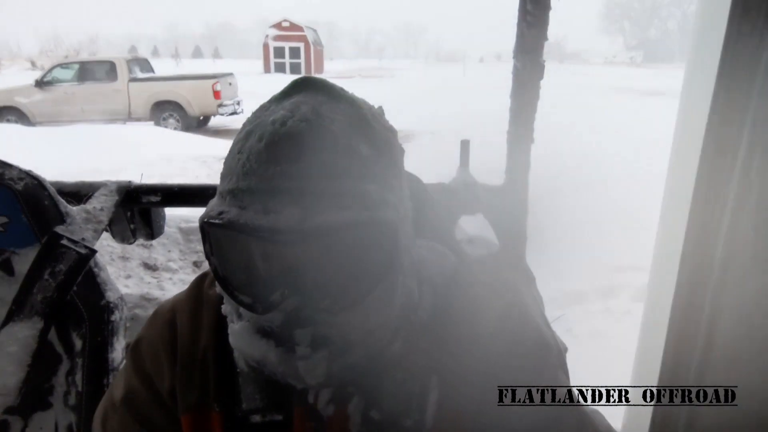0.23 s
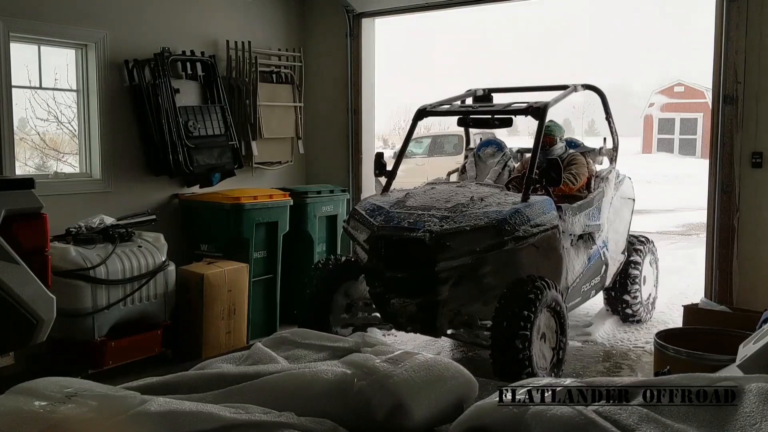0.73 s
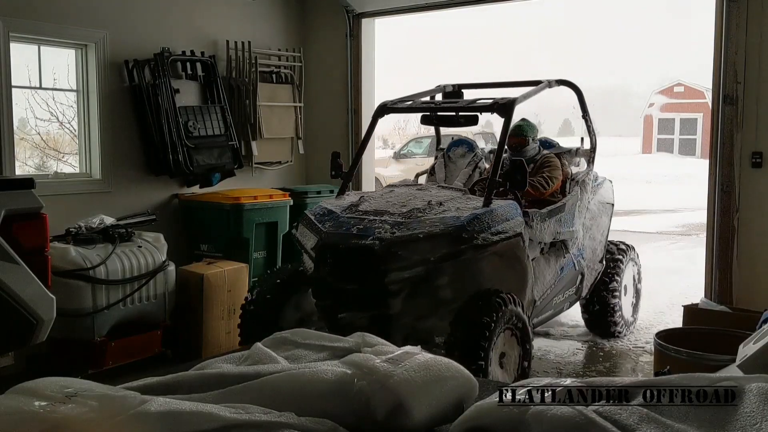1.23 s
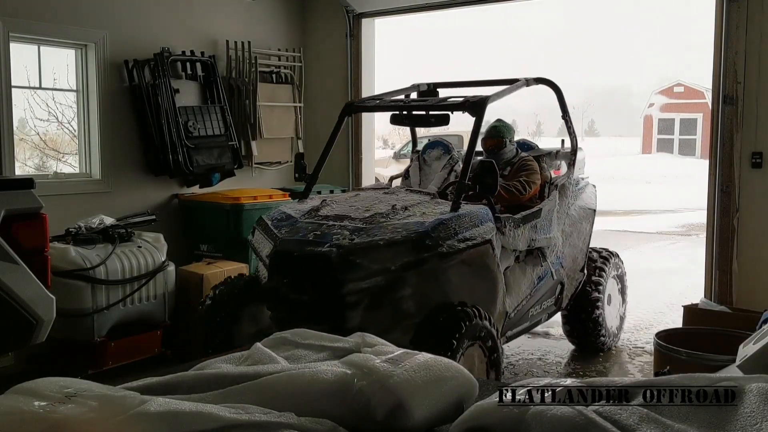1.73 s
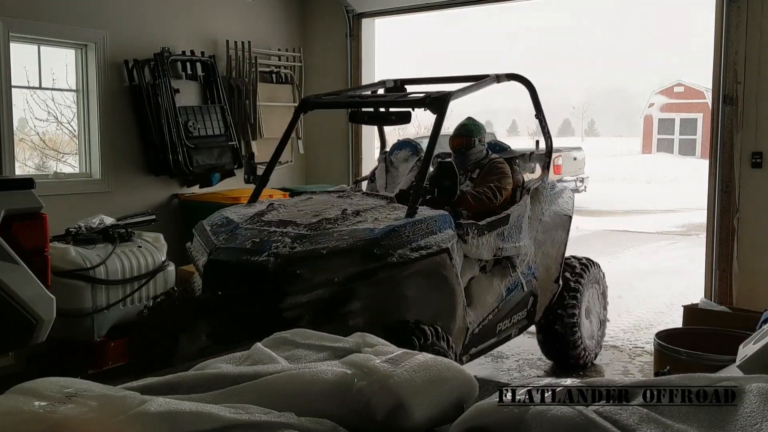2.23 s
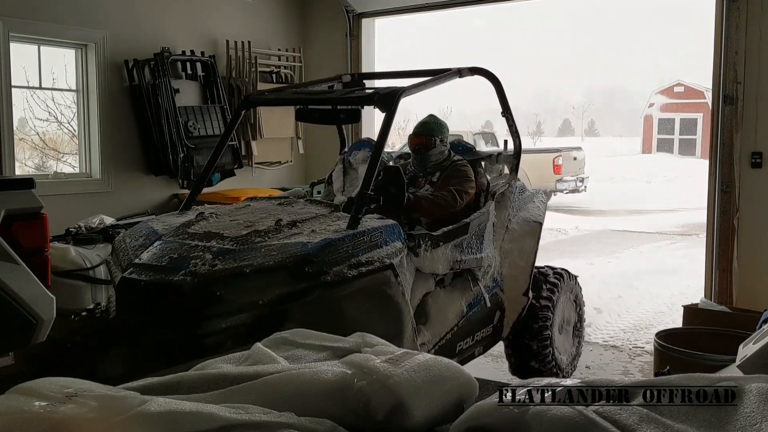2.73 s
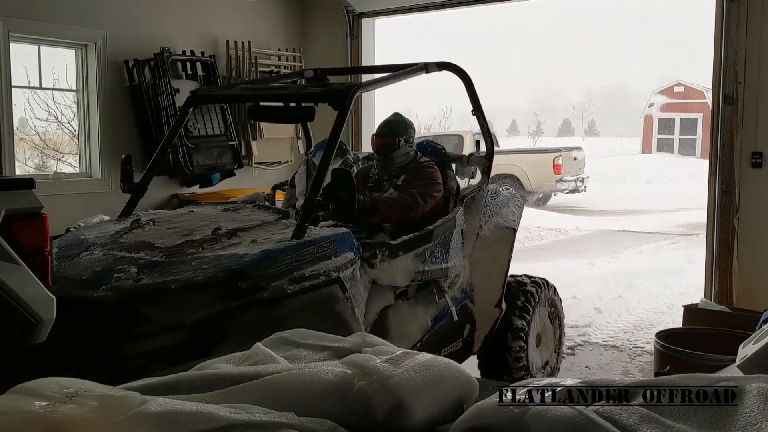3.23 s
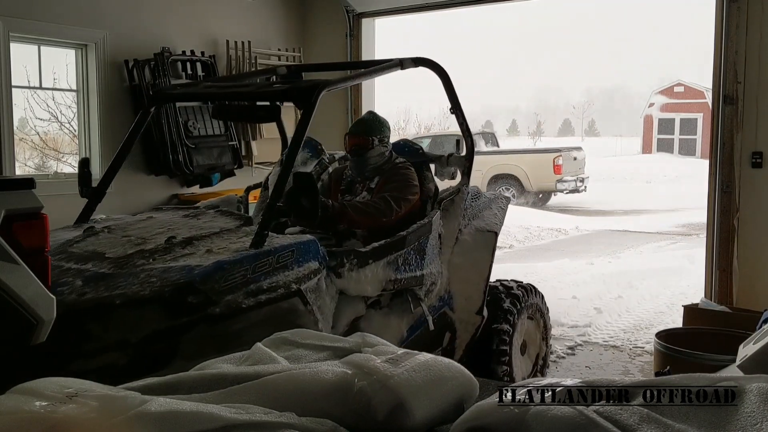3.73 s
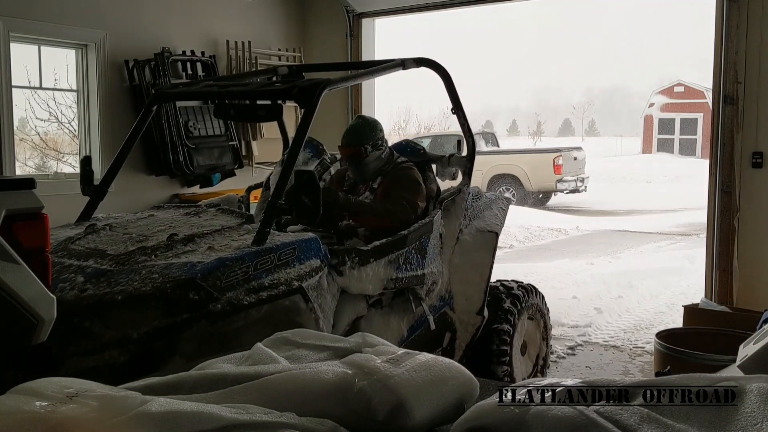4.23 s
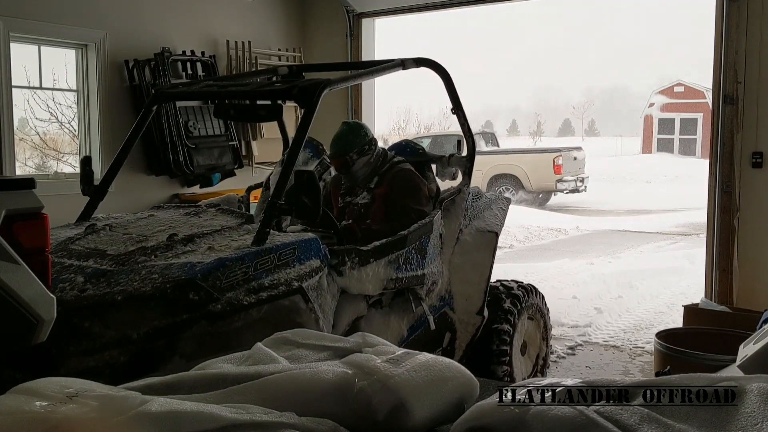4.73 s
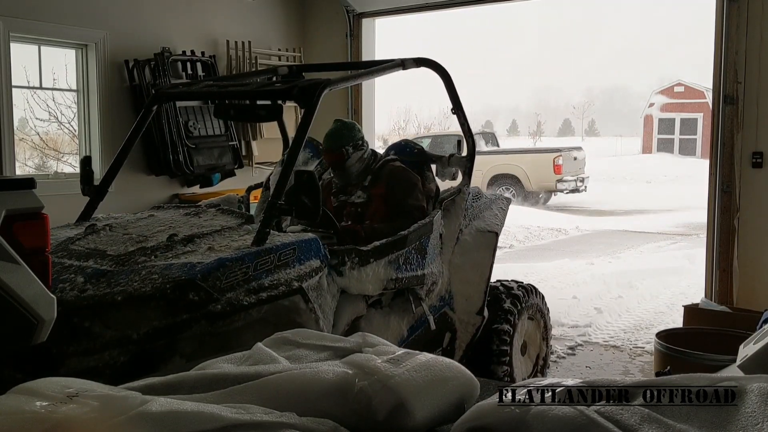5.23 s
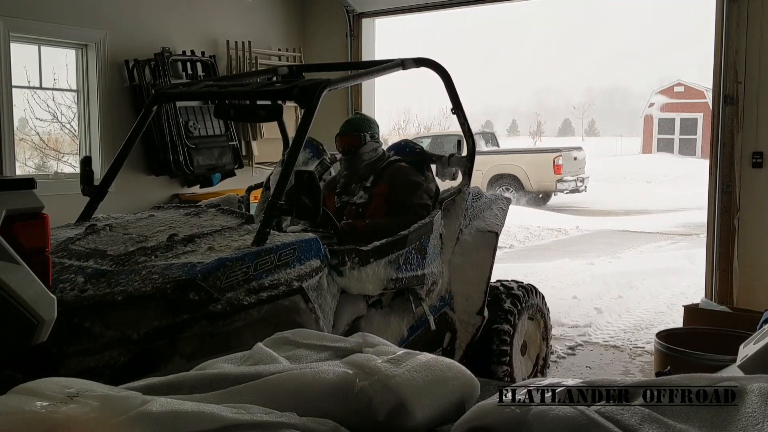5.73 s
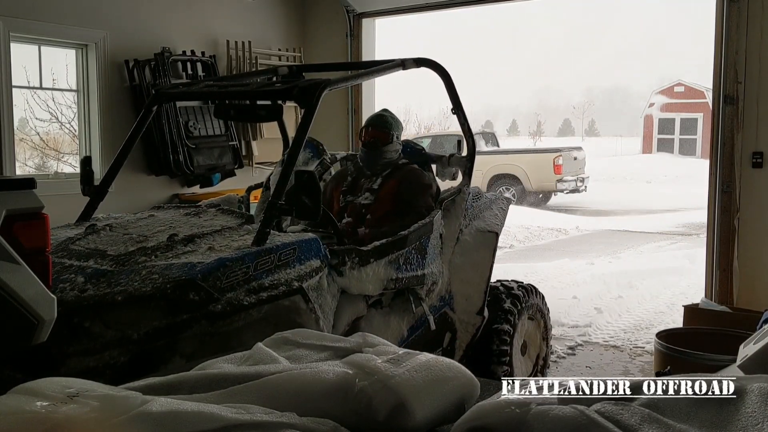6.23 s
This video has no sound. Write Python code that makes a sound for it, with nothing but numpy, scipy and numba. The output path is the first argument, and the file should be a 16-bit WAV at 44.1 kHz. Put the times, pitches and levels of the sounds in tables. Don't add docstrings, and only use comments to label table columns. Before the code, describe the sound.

Close engine boom and snowy hiss jump to a duller distant buggy rolling into a garage, revving once, a panel singing, then steady puttering idle.

```python
import sys
import numpy as np
from scipy import signal
from scipy.fft import rfft, irfft, next_fast_len
from scipy.io import wavfile
from scipy.ndimage import uniform_filter1d
from numba import njit

SR = 44100
rng = np.random.default_rng(int(sys.argv[2]) if len(sys.argv) > 2 else 0)


def file_out(sig):
    cols = np.atleast_2d(sig).T
    lim = np.clip(cols, -1, 1)
    pcm = np.round(lim * 32767).astype(np.int16)
    wavfile.write(sys.argv[1], SR, pcm)


def convert_level_to_amplitude(level_db):
    exponent = np.asarray(level_db, float) / 20
    return 10 ** exponent


N = 285327
TIME = np.arange(N) / SR

# t/s, f/Hz
CAGE_SPEED = [
    (-0.003, 16.131),
    (0.174, 15.789),
    (0.26, 15.024),
    (0.471, 12.841),
]
# t/s, f/Hz
GARAGE_SPEED = [(.52, 22.9), (.64, 22.1), (.806, 19.9), (.92, 19.6), (1.014, 18.5), (1.188, 16.2),
                (1.421, 12.512), (1.516, 12.187), (1.607, 12.807), (1.786, 17.126), (1.851, 17.399),
                (2.221, 17.34), (2.73, 12.48), (2.755, 12.025), (3.162, 11.973), (3.512, 10.525),
                (3.833, 10.142), (6.507, 10.121)]
# t/s, change of rate/Hz, width/s
HUNTS = [
    (3.675, 0.234, 0.041),
    (4.071, 0.184, 0.095),
    (4.281, -0.128, 0.049),
    (4.628, -0.183, 0.1),
    (4.875, 0.387, 0.14),
    (5.177, -0.427, 0.04),
    (5.37, 0.181, 0.139),
    (6.06, 0.153, 0.255),
]
# t/s, level/dB, load/0-1
CAGE_EFFORT = [
    (0, -32.5, 0.99),
    (.25, -30, 0.8),
    (.36, -27.5, 0.98),
    (.47, -28.5, 0.82),
]
# t/s, level/dB, load/0-1
GARAGE_EFFORT = [(.48, -41, 0.55), (.63, -48.5, 0.61), (.78, -44, 0.77), (.95, -40.5, 0.65),
                 (1.199, -43.5, 0.42), (1.35, -45, 0.2), (1.55, -42.5, 0.43), (1.7, -35, 0.68),
                 (1.85, -35, 0.85), (2.25, -31.5, 0.9), (2.5, -37.5, 0.8), (2.8, -37, 0.46),
                 (3.3, -37, 0.68), (3.6, -39.5, 0.76), (4.6, -39.5, 0.67), (5.3, -39, 0.79),
                 (6.47, -39.5, 0.72)]
# f/Hz, width/Hz, level/dB
CAGE_BOOM = [(57.4, 11.9, 8.7), (79.8, 7.1, 19.0), (91.2, 4.8, 4.0), (105.5, 7.2, -2.5),
             (133.7, 32.0, -6.1), (191.5, 21.6, -11.1)]
GARAGE_BOOM = [(35, 13.8, 4), (43.1, 1.9, 3.5), (51.4, 1.1, -3.5), (71.3, 5.4, 8.5), (79.1, 4.6, 7),
               (83.3, 11.8, 0.9), (93.53, 4.34, 13), (105.5, 14.5, 0), (137.4, 7, -8.5), (156, 14.4, -12.5),
               (170.8, 9.1, -8.5), (192.6, 0.6, -5), (207.1, 0.89, -7.5)]
DOORWAY_BOOM = [(37, 10.6, 1), (54.6, 17, 2), (73, 16, 3), (99.7, 9.9, 6.5), (110.2, 11, 3), (150, 22, -25)]
TRIM_HZ = [10.2, 12, 14.3, 17.3]
# order, level/dB at idle, creeping, slowing, revving
CAGE_TRIM = [(2, 0, 6, 12, 24), (6, 0, -2, 9, 35), (7, 0, -12, -3.5, 0), (8, 0, 9, -1.5, 1.5),
             (9, 0, 2, -5, 7.5), (10, 0, 1, 8, 10), (11, 0, 5, 10, -11), (14, 0, 3, 8, 16),
             (18, 0, 0, 6, 8)]
GARAGE_TRIM = [(2, 0, -9, -13, -20), (3, -3, -4, -17, -27), (4, -0.5, 1, 0, 1.5), (5, 2, 0, 2.5, -4.5),
               (6, -8, -14, -6, -2.5), (7, -7.5, -6, 2.5, 11.5), (8, -1.5, 2, -1, 0), (9, 0.5, 2.5, 7.5, 0),
               (10, -4.5, -12, -5, -4.5), (11, -4.5, 5, 9, 21.5), (12, -5.5, 8.5, -5, -7),
               (13, 2.5, 3.5, -9, 12), (14, -4, -13, 12.5, -2), (15, -21, 3, -2, -5), (16, 4, 3, -6, -5),
               (17, -2.5, 1.5, 4, 11.5), (18, -6.5, 5, 9, 9), (19, 4, 17.5, 6, -7), (20, 3, 11, -6, -10),
               (21, 3.5, -9, 14, -14)]
# order, level/dB
DOORWAY_TRIM = [(2, -1), (3, 7), (4, 4.5), (5, 2.5), (6, -7), (7, 6), (8, 3.5), (9, -3)]
# f/Hz, width/Hz, level/dB
CAGE_RING = [(176.5, 22, -2.5), (219, 19, -3.5), (294, 18, -1), (346, 18, -11), (397.6, 12, -1.5),
             (538, 60, -17), (726, 90, -12.5), (855, 60, -17)]
GARAGE_RING = [(217.7, 3.6, -17), (263.9, 29, -2.5), (310.4, 29.3, 1.5), (328.8, 18, -8.5),
               (348, 5.4, -11.5), (509.4, 49, -18), (644, 41, -21.5), (804.4, 36, -20), (966, 34, -19)]
# f/Hz, density/dB per Hz
CAGE_HISS = [(150, -45), (250, -1), (393, -4.5), (586, -13), (802, -7.5), (955, -19), (1910, -26),
             (3230, -28), (11500, -41), (16000, -43)]
GARAGE_HISS = [(150, -14), (330, -22), (450, -29), (800, -29), (880, -38), (980, -30), (1200, -37),
               (1490, -29.5), (1880, -44), (2400, -32.5), (4200, -41), (6500, -47), (12500, -65.5),
               (16000, -64)]
# t/s, level/dB
CAGE_AIR = [
    (0, -49),
    (.2, -49.5),
    (.3, -50),
    (.38, -48.5),
    (.47, -46),
]
# t/s, rise/s, fall/s, level/dB, f/Hz
SLUSH = [
    (1.795, 0.022, 0.07, -38, 3100),
    (2.77, 0.012, 0.055, -44.5, 3300),
    (5.195, .02, 0.08, -44, 2800),
    (5.195, .02, .07, -58.5, 10500),
    (5.195, 0.02, 0.08, -44.5, 900),
    (5.264, 0.022, 0.09, -35.5, 2900),
    (5.268, .02, .07, -41, 4600),
    (5.26, .03, .1, -45, 600),
]
# t/s, length/s, level/dB
PANEL = [
    (1.5, 0.1, -60),
    (2.15, 0.15, -52),
    (2.72, .06, -54),
    (2.845, 0.12, -44),
    (3.075, 0.16, -42.5),
    (3.285, 0.04, -49),
]
# t/s, level/dB
SPRAY = [
    (0, -57.5),
    (.22, -54.5),
    (.27, -68),
    (.47, -59),
    (.485, -77),
    (.5, -52),
    (.54, -74),
    (.58, -106),
]
# t/s, level/dB
RUMBLE = [
    (.48, -36),
    (.65, -43),
    (.85, -46),
    (1.2, -47),
    (1.55, -47),
    (1.8, -42),
    (2.55, -38),
    (2.8, -48),
    (6.47, -52),
]
# f/Hz, width/Hz, level/dB
ROOM_BASS = [(42, 25, 2), (68, 9.2, 5), (98.5, 13, 4), (119, 23, -6)]
# f/Hz, likeness/0-1, left minus right/dB, left lag/rad
CAGE_PORTS = [(40, 0.84, -1.3, 0), (170, 0.88, -3.5, 0), (302, 0.54, -6, 0.0077), (700, 0.33, -3, 0),
              (1400, 0.25, 0.5, 0), (3000, 0.06, -3.5, 0), (11000, 0, -4.5, 0)]
GARAGE_BASS_PORTS = [(40, .995, 2, .17), (90, .995, 4, .47), (170, .96, 4.7, .97), (300, .97, 4.6, 1.67)]
GARAGE_PORTS = [(600, 1, 4.5, 1.58), (1020, 1, 5.8, 1.04), (1480, 0.2, 5, 0.044), (2460, 0.038, 0.15, -1.4),
                (4350, .03, 8.6, -1.1), (7150, 0.017, 10.3, -0.97), (15000, .02, 28.6, 0.61)]

CUT_S, CUT_FADE_S = 0.4742, 0.00007
CLICK_DB, CLICK_RISE_S = -14, 0.003
DOOR_S, DOOR_SPAN_S = 1.662, 0.13
FAN_DB_PER_HZ, FAN_OUTSIDE_DB_PER_HZ, FAN_IDLE_HZ = 0.5939, 0.081, 7.46
DULL_DB_PER_OCTAVE, ORDER_WANDER_DB = 26, 0.03
KNOCK_DB_PER_LOAD, KNOCK_SPLIT_HZ, KNOCK_TREBLE_SHARE = 33.5, 400, 0.48
ECHO_DB, ECHO_FALL_S = -4, 0.065
BREATH_DB = 1.15
GROWL_S, GROWL_HOLD_S, GROWL_DB, GROWL_ATTACK_DB_S, GROWL_RELEASE_DB_S = 1.8, 0.69, -45, 200, 33
SLUSH_TOP_HZ = 6800
PANEL_HZ, PANEL_ATTACK_DB_S, PANEL_RELEASE_DB_S = 490, 210, 170
PANEL_UPPER_HZ, PANEL_UPPER_DB, PANEL_UPPER_LATE_S = 517, -7, 0.06
PUMP_HZ, PUMP_DB = 13107, -88
SPRAY_HZ, SPRAY_WIDTH_HZ = 10800, 16000
HOUSING_HZ, TOP_HZ = 1876, 15760


def buggy(hz, outside, effort, boom, trim, lag, modes, colour, start_turn, second_turn, second_db, knock_db, hiss_db):
    level_db, load = curves(effort)
    turns = start_turn + np.cumsum(hz) / SR
    exhaust = convert_level_to_amplitude(level_db) * drone(hz, turns, outside, boom, trim, lag, second_turn, second_db)
    ring = convert_level_to_amplitude(knock_db) * knock(hz, turns, second_turn, load, modes)
    throb = convert_level_to_amplitude(hiss_db + 0.26 * np.cos(2 * np.pi * turns + 3.6) + 0.21 * walk(5.95))
    breath = BREATH_DB * uniform_filter1d(np.cos(2 * np.pi * turns + 2.0) + 0.98 * walk(45), size=64)
    near = exhaust + ring + hiss(colour, throb, breath, flicker_db=0.77)
    return near, hiss(colour, throb, breath, flicker_db=0.7)


def speed():
    swings = sum(step * np.exp(-((TIME - s) / width) ** 2) for s, step, width in HUNTS)
    return curves(GARAGE_SPEED)[0] + swings


def drone(hz, turns, outside, boom, trim, lag, second_turn, second_db):
    out = 0
    coarse = slice(None, None, 64)
    slow_hz, outdoors = hz[coarse], outside[coarse]
    indoors = 1 - outdoors
    trim_db = {round(k): db for k, *db in trim}
    doorway_db = dict(DOORWAY_TRIM)
    for k in range(2, 22):
        f = k * slow_hz
        gain = indoors * resonate(f, boom) + outdoors * resonate(f, DOORWAY_BOOM)
        gain = gain * (1 + convert_level_to_amplitude(second_db) * np.exp(-2j * np.pi * k * second_turn))
        octaves_up = np.maximum(np.log2(f / 102), 0)
        level_db = outdoors * (doorway_db.get(k, 0) - DULL_DB_PER_OCTAVE * octaves_up)
        level_db = level_db + indoors * np.interp(slow_hz, TRIM_HZ, trim_db.get(k, np.zeros(len(TRIM_HZ))))
        gain = gain * convert_level_to_amplitude(level_db + ORDER_WANDER_DB * walk(8)[coarse])
        phase = 2 * np.pi * (k * turns + lag)
        out = out + np.real(np.interp(TIME, TIME[coarse], gain) * np.exp(1j * phase))
    return out


def resonate(f, boom):
    return sum((-1) ** m * convert_level_to_amplitude(db) * 1j * f * w / (c ** 2 - f ** 2 + 1j * f * w)
               for m, (c, w, db) in enumerate(boom))


def knock(hz, turns, second_turn, load, modes):
    pulses = firings(turns, second_turn, second_db=2.5, scatter_db=1.3, jitter_s=0.00015)
    pulses = echoed(pulses / np.sqrt(hz))
    ring = 0
    for k, (f, width, db) in enumerate(modes):
        share = KNOCK_TREBLE_SHARE if f > KNOCK_SPLIT_HZ else 1
        level_db = db + KNOCK_DB_PER_LOAD * (load - 1) * share
        ring = ring + (-1) ** k * convert_level_to_amplitude(level_db) * band(pulses, f, 0.65 * width)
    return ring


def firings(turns, second_turn, second_db, scatter_db, jitter_s):
    cycles = np.arange(int(turns[0]), int(turns[-1]) + 1)
    when = np.interp(np.concatenate([cycles, cycles + second_turn]), turns, TIME)
    chance = rng.standard_normal((len(when), 2))
    size_db = np.repeat([0, second_db], len(cycles)) + scatter_db * chance[:, 0]
    size = convert_level_to_amplitude(size_db) * (when > 0)
    place = np.clip((when + jitter_s * chance[:, 1]) * SR, 0, N - 1).astype(int)
    pulses = np.zeros(N)
    np.add.at(pulses, place, size)
    return pulses


def echoed(pulses):
    fade = signal.lfilter([1], [1, -np.exp(-2 / (ECHO_FALL_S * SR))], pulses ** 2)
    return unit(pulses) + convert_level_to_amplitude(ECHO_DB) * unit(np.sqrt(fade) * rng.standard_normal(N))


def hiss(colour, throb, breath, flicker_db):
    out = 0
    for hz in 125 * 2 ** np.arange(0, 7.1, 1 / 4):
        noise = svf(rng.standard_normal(N), hz, hz / 4)
        noise = svf(noise, hz, hz / 4 + hz ** 2 / 5e4)
        level_db = on_log(hz, colour, column=1) + flicker_db * walk(16)
        out = out + noise * convert_level_to_amplitude(level_db + breath * hz / 12000)
    return out * throb / np.std(svf(out, 4220.0, 5600.0))


def growl(hz):
    gulp = convert_level_to_amplitude(0.71 * np.cos(4 * np.pi * np.cumsum(hz) / SR))
    open_db = held(GROWL_S, GROWL_HOLD_S, GROWL_DB, GROWL_ATTACK_DB_S, GROWL_RELEASE_DB_S)
    return convert_level_to_amplitude(open_db) * gulp * band(rng.standard_normal(N), 490, 250)


def slush():
    out = np.zeros(N)
    for s, rise, fall, db, hz in SLUSH:
        age = np.maximum(TIME - s, 0)
        swell = (1 - np.exp(-(age / rise) ** 2)) * np.exp(-age / fall)
        grains = rng.standard_normal(N) * convert_level_to_amplitude(1.6 * walk(150))
        dull = signal.butter(4, max(SLUSH_TOP_HZ, 1.5 * hz), fs=SR, output="sos")
        grains = svf(signal.sosfilt(dull, grains), 1.0 * hz, 1.2 * hz)
        out += convert_level_to_amplitude(db) * swell * unit(svf(grains, 0.7 * hz, 1.6 * hz))
    return out


def panel():
    gain = convert_level_to_amplitude(np.max([held(*row, PANEL_ATTACK_DB_S, PANEL_RELEASE_DB_S) for row in PANEL], axis=0))
    rub = convert_level_to_amplitude(-7) * band(rng.standard_normal(N), PANEL_HZ, 40)
    late_gain = convert_level_to_amplitude(PANEL_UPPER_DB) * np.roll(gain, int(PANEL_UPPER_LATE_S * SR))
    return gain * (panel_tone(PANEL_HZ) + rub) + late_gain * panel_tone(PANEL_UPPER_HZ)


def panel_tone(hz):
    phase = 2 * np.pi * np.cumsum(hz + 4 * walk(10)) / SR
    return np.sqrt(2) * convert_level_to_amplitude(2.5 * walk(30)) * np.sin(phase)


def spray():
    return convert_level_to_amplitude(curves(SPRAY)[0]) * band(rng.standard_normal(N), SPRAY_HZ, SPRAY_WIDTH_HZ)


def rumble():
    modes = sum(convert_level_to_amplitude(db) * band(rng.standard_normal(N), f, 1.95 * w) for f, w, db in ROOM_BASS)
    return convert_level_to_amplitude(curves(RUMBLE)[0]) * modes


def pump():
    return convert_level_to_amplitude(PUMP_DB) * np.sin(2 * np.pi * PUMP_HZ * TIME + 3 * walk(30))


def ports(near, diffuse, table, ripple_db):
    size = next_fast_len(N + SR)
    hz = np.maximum(np.arange(size // 2 + 1) * SR / size, 1)
    like, tilt_db, lag = (on_log(hz, table, column=c) for c in (1, 2, 3))
    like = np.clip(like, 0, 1)
    reach = np.clip(hz / 2500 - 1.3, 0, 1) * np.clip(2.6 - hz / 4800, 0, 1)
    housing = convert_level_to_amplitude(ripple_db * np.cos(2 * np.pi * hz / HOUSING_HZ) * reach) * (hz < TOP_HZ)
    a, b = rfft(near, size) * housing, rfft(diffuse, size) * housing
    skew = convert_level_to_amplitude(tilt_db / 2) * np.exp(-0.5j * lag)
    left = a * skew
    right = (like * a + np.sqrt(1 - like ** 2) * b) / skew
    return np.array([irfft(left, size)[:N], irfft(right, size)[:N]])


def unit(x):
    return x / np.sqrt(np.mean(x ** 2))


@njit
def svf(x, hz, width):
    y, b, l = np.empty(len(x)), 0., 0.
    g, k = np.tan(np.pi * hz / SR), width / hz
    for i in range(len(x)):
        v = (b + g * (x[i] - l)) / (1 + g * (g + k))
        b, l, y[i] = 2 * v - b, l + 2 * g * v, k * v
    return y


def band(x, hz, width):
    hz, width = float(hz), float(width)
    return unit(svf(svf(x, hz, width), hz, width))


def walk(rate):
    k = int(SR / rate)
    steps = np.repeat(rng.standard_normal(N // k + 1), k)
    return uniform_filter1d(uniform_filter1d(steps, k), k)[:N]


def held(s, length, db, attack_db_s, release_db_s):
    return db - attack_db_s * np.maximum(s - TIME, 0) - release_db_s * np.maximum(TIME - s - length, 0)


def curves(table):
    s, *columns = np.transpose(table)
    return [np.interp(TIME, s, c) for c in columns]


def on_log(hz, table, column):
    table = np.array(table)
    return np.interp(np.log(hz), np.log(table[:, 0]), table[:, column])


def cage_view():
    near, diffuse = buggy(curves(CAGE_SPEED)[0], np.zeros(N), CAGE_EFFORT, CAGE_BOOM, CAGE_TRIM, lag=0.51,
                          modes=CAGE_RING, colour=CAGE_HISS, start_turn=0.893, second_turn=0.25,
                          second_db=-0.5, knock_db=-33.5, hiss_db=curves(CAGE_AIR)[0])
    return ports(near, diffuse, CAGE_PORTS, ripple_db=2.5)


def garage_view():
    hz = speed()
    inside = np.clip((TIME - DOOR_S) / DOOR_SPAN_S, 0, 1)
    db_per_hz = FAN_OUTSIDE_DB_PER_HZ * (1 - inside) + FAN_DB_PER_HZ * inside
    fan_db = uniform_filter1d(-53.5 + db_per_hz * (hz - FAN_IDLE_HZ), size=SR // 12)
    near, diffuse = buggy(hz, 1 - inside, GARAGE_EFFORT, GARAGE_BOOM, GARAGE_TRIM, lag=0.474,
                          modes=GARAGE_RING, colour=GARAGE_HISS, start_turn=0.162, second_turn=0.232,
                          second_db=0.87, knock_db=-37.0, hiss_db=fan_db)
    near = near + rumble() + slush() + panel() + pump()
    garage = ports(near, diffuse + slush(), GARAGE_BASS_PORTS + GARAGE_PORTS, ripple_db=2.5)
    return garage + ports(growl(hz), np.zeros(N), GARAGE_BASS_PORTS, ripple_db=-2)


def scene():
    after = np.clip((TIME - CUT_S) / CUT_FADE_S, 0, 1)
    click = np.exp(-np.abs(TIME - CUT_S) / CLICK_RISE_S)
    cage = (1 - click) * cage_view() + convert_level_to_amplitude(CLICK_DB) * click
    garage = (1 - click) * garage_view()
    snow = ports(spray(), spray(), CAGE_PORTS, ripple_db=2)
    return (1 - after) * cage + after * garage + snow


def low_pass(x):
    return signal.sosfilt(signal.butter(12, 16540, fs=SR, output="sos"), x)


def record(dry):
    return low_pass(dry)


dry = scene()
out = record(dry)
file_out(out)
```